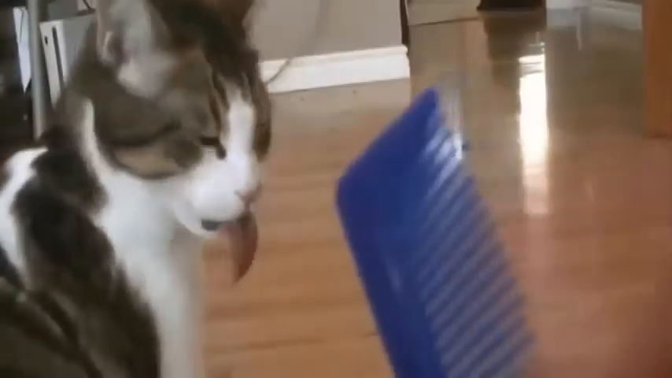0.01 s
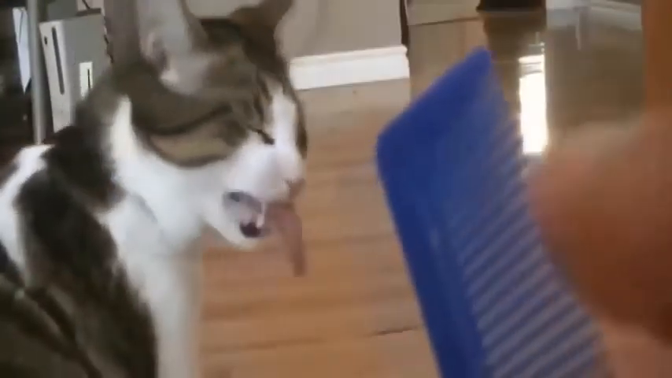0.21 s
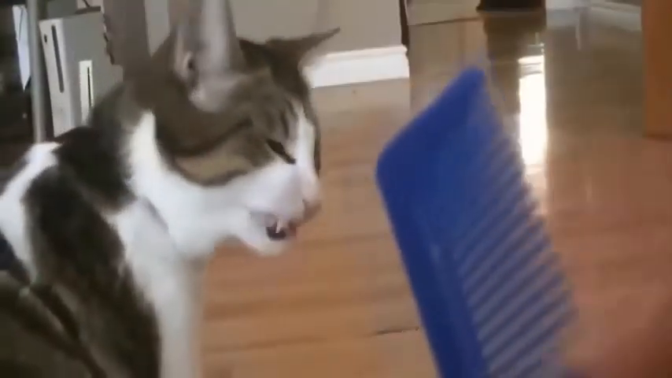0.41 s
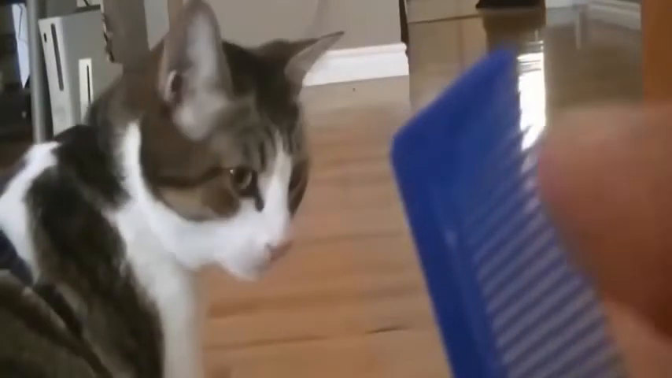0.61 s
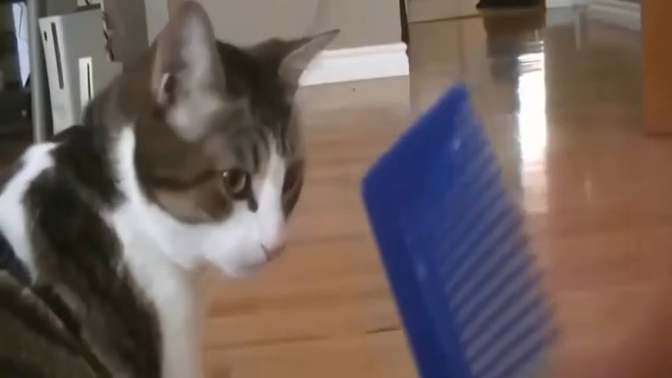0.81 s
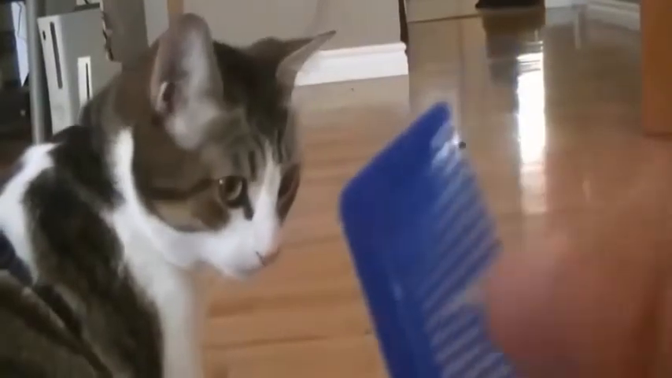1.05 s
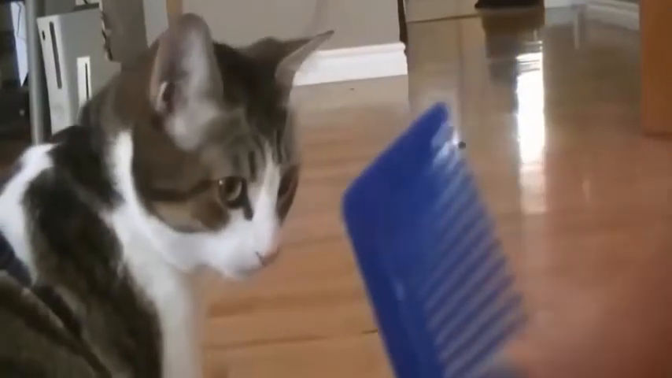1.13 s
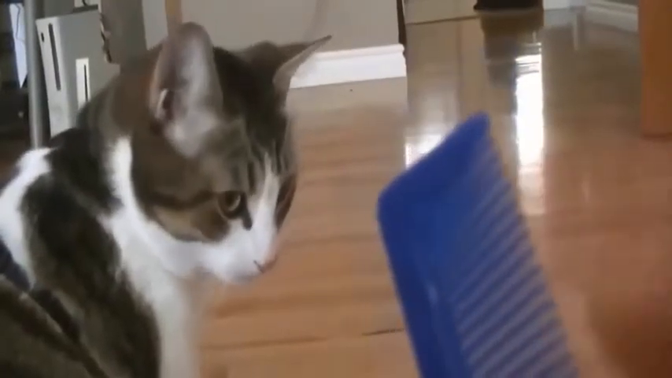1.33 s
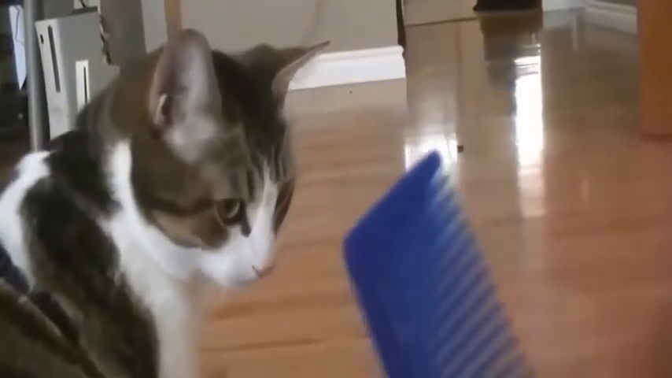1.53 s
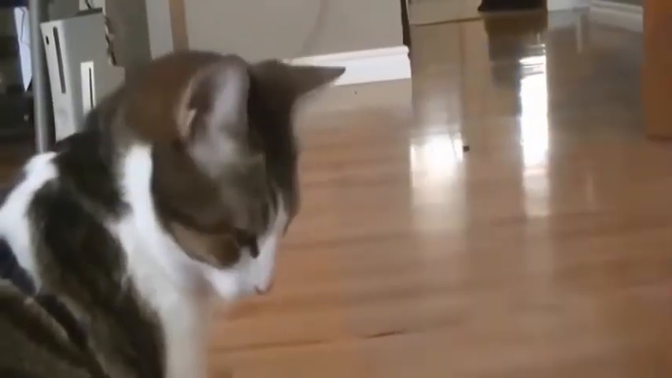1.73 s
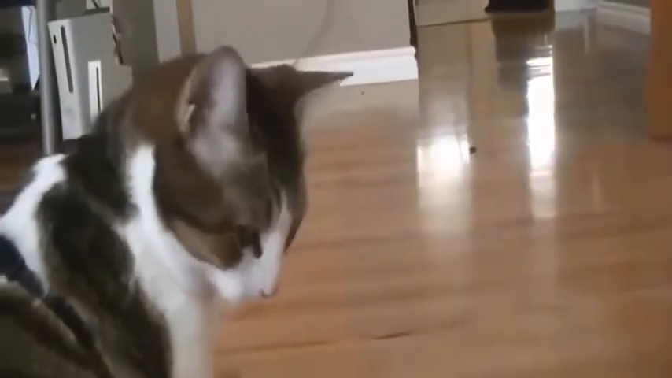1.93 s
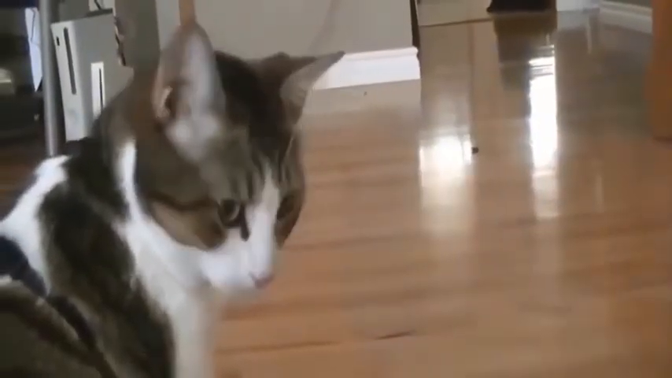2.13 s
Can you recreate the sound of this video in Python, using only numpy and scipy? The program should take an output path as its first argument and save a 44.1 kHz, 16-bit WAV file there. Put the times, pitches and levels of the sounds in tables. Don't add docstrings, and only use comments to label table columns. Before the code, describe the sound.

Plastic comb teeth strummed by a fingernail, close and dry in a bare room. A faint rub and taps open, then five raspy bursts of about ten rapid bright snaps: 0.23-0.37, 0.63-0.76, 1.02-1.21, 1.42-1.61 and 1.81-1.90 seconds, the last quickest. Light ticks fall between. A soft sleeve rustle swells around 2.1 seconds. Quiet hiss and very faint appliance hum lie beneath.

```python
import sys
import numpy as np
from scipy import signal
from scipy.fft import rfft, irfft
from scipy.io import wavfile
from scipy.ndimage import uniform_filter1d

SR = 44100
rng = np.random.default_rng(int(sys.argv[2]) if len(sys.argv) > 2 else 0)


def unload_wav(signal):
    wavfile.write(
        sys.argv[1],
        SR,
        np.round(np.clip(np.atleast_2d(signal).T, -1, 1) * 32767).astype(np.int16),
    )


def volts_from_db(level):
    exponent = np.asarray(level, float) / 20
    return 10 ** exponent


N = 97020

SLIP_S = 0.00058
RING_T60_S = 0.025
TOUCH_SCRAPE_DB = -10


def rms_one(x):
    return x / np.sqrt(np.mean(x ** 2) + 1e-20)


def coloured(points):
    hz, db = np.transpose(points)
    f = np.fft.rfftfreq(N, 1 / SR) + 1
    gain = volts_from_db(np.interp(np.log(f), np.log(hz), db)) * (f < 15900)
    return rms_one(irfft(rfft(rng.standard_normal(N)) * gain, N))


def filtered(x, order, hz, kind):
    return signal.sosfilt(signal.butter(order, hz, kind, fs=SR, output="sos"), x)


def knock(s):
    return 1. * (np.arange(1500) == int(s * SR))


def ring(force, hz, t60):
    r = volts_from_db(-60 / (t60 * SR))
    w = 2 * np.pi * hz / SR
    return signal.lfilter([.5, 0, -.5], [1, -2 * r * np.cos(w), r * r], force + 1e-18)


def add(out, s, x):
    i = int(s * SR)
    out[i:i + len(x)] += x[:N - i]


def rub():
    # t/s, level/dB
    swells = [
        (0, -55),
        (.012, -60),
        (.024, -58),
        (.034, -61),
        (.041, -53.5),
        (.052, -48.5),
        (0.061, -48.5),
        (.066, -60),
        (0.079, -71),
    ]
    # f/Hz, level/dB
    colour = [(900, -31), (1500, 2), (1750, 8), (2100, -6), (3500, -6), (5500, -1), (8500, -9.5),
              (15000, -24)]
    s, db = np.transpose(swells)
    lumps_db = rms_one(uniform_filter1d(rng.standard_normal(N), int(0.00034 * SR)))
    return volts_from_db(np.interp(np.arange(N) / SR, s, db, right=-120) + lumps_db) * coloured(colour)


def air():
    # f/Hz, level/dB
    hiss = [(50, -42), (85, -31), (200, -4.5), (310, -7.5), (620, -4.5), (1000, -10), (2690, -10),
            (15800, -23)]
    # f/Hz, width/Hz, level/dB
    hum = [(238, 4, -73), (590, 40, -82), (706, 15, -78)]
    out = volts_from_db(-57.5) * coloured(hiss)
    for hz, width, db in hum:
        out = out + volts_from_db(db) * rms_one(ring(rng.standard_normal(N), hz, 2.2 / width))
    return out


def crack(place, middle_db=0, top_db=0):
    # f/Hz, level/dB, t60/s, change from mid-stroke to last tooth/dB, reversed towards
    modes = [(460, -22.5, 0.0062, -9.5), (4130, -26, 0.0011, 19), (1620, -10, 0.0028, 0),
             (2890, -6, 0.0039, -3), (3300, -8.5, 0.0071, -4.5), (5030, -23.5, 0.012, -19),
             (5570, -12, 0.0069, -8.5), (6715, -10, 0.0048, -7.5), (8264, -11, 0.0034, -11),
             (8470, -25.5, 0.0027, -13.5), (10690, -8.5, 0.0022, -6), (13400, -24, 0.009, 11),
             (14530, -19, 0.0037, -15.5)]
    spread_s, rebound_db = .0007, -6.5
    cycles_most = 42
    shaded = plain = 0
    for k, (hz, db, t60, change_db) in enumerate(modes):
        level, detune, first, second = rng.uniform(-0.99, 1, 4)
        delay = k * .618 % 1 + .1 * (first + 1)
        force = (-1) ** k * knock(SLIP_S + spread_s * delay * (1 if hz < 6000 else .6))
        if hz > 4000:
            rebound = knock(SLIP_S + 2 * spread_s * abs(second))
            force = force + volts_from_db(rebound_db) * np.sign(second) * rebound
        mode = ring(force, hz * (1 + .02 * detune), min(t60, cycles_most / hz))
        mode = volts_from_db(db + 2 * change_db * place + 2 * level) * mode
        shade_db = top_db if hz > 7500 else middle_db if hz > 4200 else 0
        plain = plain + mode
        shaded = shaded + volts_from_db(shade_db) * mode
    pull = knock(SLIP_S + spread_s / 2)
    return shaded / np.abs(plain).max(), pull


def soften(x):
    return filtered(x, 2, [2300, 6800], "band")


def touches():
    # t/s, peak/dB
    taps = [
        (0.021, -46),
        (0.04, -37),
        (.0575, -31),
        (0.0608, -44),
        (0.41, -37),
        (.399, -57),
        (1.6114, -35),
        (1.63, -38),
        (1.8018, -39),
        (0.67, -42),
    ]
    out, push = np.zeros((2, N))
    for s, db in taps:
        tick, pull = crack(0)
        add(out, s, volts_from_db(db) * (soften(tick) + volts_from_db(-23) * ring(pull, 1740, RING_T60_S)))
        push[int(s * SR)] = volts_from_db(db + TOUCH_SCRAPE_DB)
    return out, push


def held(x, hold_s):
    t = np.maximum(np.arange(len(x)) / SR - SLIP_S, 0)
    return x * (1 - np.exp(-t / .0009)) * np.exp(-(t / hold_s) ** 3)


def spine_ring(pull):
    hz = 1055
    return held(ring(pull, hz, RING_T60_S), 0.0074) + volts_from_db(3.5) * ring(pull, hz, 0.0032)


def tooth_ring(pull, hz, beside_db, progress):
    pair = ring(pull, hz, RING_T60_S) - volts_from_db(beside_db) * ring(pull, 2250, RING_T60_S)
    tooth = held(pair, .0042 + .0011 * progress)
    tooth = tooth + volts_from_db(1.5) * ring(pull, hz * 1.07, 0.0026)
    return filtered(tooth, 2, 1060, "high")


def trail(drag, s, db):
    t = np.arange(N) / SR - s
    return np.where(t < 0, drag, volts_from_db(db) * np.exp(-np.abs(t) / 0.011))


def teeth():
    # t/s, crack peak/dB, spine ring re crack/dB, tooth ring re crack/dB, tooth pitch f/Hz
    stroke_1 = [(0.2289, -12.5, -9.5, -17, 1950), (0.2474, -10.5, -14, -35, 2170),
                (0.264, -9.5, -16, -5.5, 2200), (0.281, -10, -15.5, -8.5, 1980),
                (0.2971, -9, -45, -10, 2130), (0.3097, -12, -16.5, -11, 1990), (0.3234, -13, -52, -5, 2050),
                (0.3412, -11.5, -35, -10, 2030), (0.3461, -18.5, -11.5, 1.5, 1930),
                (0.374, -16, -18, -2.5, 1920), (0.4232, -39.5, -81, -47, 1720),
                (0.4436, -44, -35, -82, 1900)]
    stroke_2 = [
        (0.632, -10.5, -12, -10, 2240),
        (0.653, -9.5, -18.5, -16, 2160),
        (0.6715, -8.5, -17.5, -21, 2200),
        (0.6884, -9.5, -18.5, -12, 2050),
        (0.7081, -9, -18, -12, 1920),
        (0.7238, -11, -25, -11, 2100),
        (0.7426, -12.5, -20, -7.5, 1970),
        (0.7645, -11.5, -58, -6, 1915),
        (0.8136, -40, -11, -24, 1890),
        (0.8203, -40.5, -19, -5, 1720),
    ]
    stroke_3 = [(1.0195, -20.5, -7.5, -9, 1740), (1.043, -12.5, -13.5, -12.5, 2100),
                (1.069, -9, -15.5, -17, 2140), (1.0901, -9, -16.5, -14, 2150), (1.108, -5, -43, -12, 2160),
                (1.124, -11, -14.5, -7.5, 1970), (1.1369, -11.5, -29, -16, 2060),
                (1.15, -19.5, -14, 1.5, 1920), (1.16, -12.5, -56, -3.5, 2010),
                (1.1811, -13.5, -21, -5, 1890), (1.2094, -23.5, -16, -2.5, 1840)]
    stroke_4 = [(1.4172, -15, -14.5, -6.5, 2140), (1.4354, -14.5, -11.5, -5.5, 2080),
                (1.4532, -10, -18, -6, 2130), (1.4692, -10, -15.5, -6, 2050), (1.485, -9, -34, -16, 2130),
                (1.5, -11, -20, -7, 2090), (1.5135, -12, -39, -7, 1980), (1.5227, -15.5, -14, -3, 2030),
                (1.5395, -13, -27, -4, 1890), (1.556, -14, -19, -2.5, 1890), (1.5826, -11, -25, -9, 1805),
                (1.6067, -31, -19, 0.5, 1750), (1.6233, -35.5, -37, -9, 1650)]
    stroke_5 = [
        (1.8051, -18, -11, -8, 2160),
        (1.8137, -14.5, -13.5, -12, 2010),
        (1.8294, -18, -7, -3, 2100),
        (1.845, -7.5, -25, -20, 2120),
        (1.8595, -10.5, -17.5, -15, 1900),
        (1.8738, -15, -15, 0.5, 2080),
        (1.888, -10, -49, -6.5, 1950),
        (1.8966, -17, -34, -5, 2080),
        (1.9041, -19, -29, -8, 2100),
        (1.9172, -38, -26, -18, 1940),
    ]
    neighbour_db = [
        [-14, -14, -19, -14, -12, -12, -16, -12, -10, -9, -14, -14],
        [-16, -14, -14, -14, -12, -12, -6, -6, -14, -14],
        [-8, -17, -14, -14, -16, -10, -12, -6, -10, -3, -4],
        [-14, -17, -18, -16, -14, -16, -12, -7, -9, -6, 2, -1, -8],
        [-14, -14, -14, -12, -13, -14, -12, -10, -12, -10],
    ]
    # middle modes/dB, top modes/dB, drag after the snap re crack/dB
    shade = [(-1.7, -0.2, -9), (2, -1, 9.5), (3.8, -1, 7.5), (1, 5, 9), (2.3, 2.5, 2.5), (1.5, 5.5, 7),
             (3, 4, 1.5), (1, -1, 0.0), (8, 1.1, 9.5), (6.5, -7, -6), (9.5, 6, 7), (2, 13, 2), (-2, 0, -2.5),
             (-1, -0.9, 3), (-0.9, -1.0, -3), (-2, 2.5, 4.7), (-3, 3, 0), (-3, 1, 4.5), (-2.1, 0.5, -1),
             (-5, -0.5, 1.2), (-3, -0.3, 4), (9.5, 2.1, 6), (-2, -3, 5), (-1, -9, -3.5), (0, 0, 0.4),
             (1.5, 1.5, 6), (-7, -1.1, -1), (-1, 7, 2), (1, 2, 5.5), (4, 1.8, 13), (4, -1, -1.5),
             (2.5, -2.5, -9), (3.5, -15, -0.3), (-6, -8, 5), (-1, -0.5, 7), (-2.5, 3.5, 3), (-0.7, 1, -1.8),
             (-4, 5, 7), (-5, 5, 4), (-8, 4, 6), (-1, 3.5, 7), (-1, 2.9, 5), (1.9, 0, 5), (-1.5, 1, -6),
             (3, -7, 14), (-1.9, 4, 12), (0, -2.8, 6), (-1.5, -13, 5), (7.5, 2.5, -2.4), (0.3, -2.8, -2),
             (-7, 3.5, 11), (1, 5.5, -2), (-4, 2.5, -5), (6, -2, 7.5), (8, -3, 10.7), (9, 6.7, 3)]
    out, push, drag = np.zeros((3, N))
    shades = iter(shade)
    for stroke, beside_db in zip((stroke_1, stroke_2, stroke_3, stroke_4, stroke_5), neighbour_db):
        for k, (s, db, spine_db, tooth_db, hz) in enumerate(stroke):
            progress = k / len(stroke)
            middle_db, top_db, drag_db = next(shades)
            light = db < -31.5
            snap, pull = crack(progress - .5, middle_db, top_db)
            x = 2 * soften(snap) if light else snap
            x = x + volts_from_db(tooth_db - 0.55) * tooth_ring(pull, hz, beside_db[k], progress)
            x = x + volts_from_db(spine_db + 0.5) * spine_ring(pull)
            if not light:
                x = x + volts_from_db(-38.5) * ring(pull, 233, 0.016)
            add(out, s, volts_from_db(db) * x)
            push[int(s * SR)] = volts_from_db(db + light * TOUCH_SCRAPE_DB)
            drag = trail(drag, s, db + drag_db)
    return out, push, drag


def scrape(push, drag):
    # f/Hz, level/dB
    colour = [(300, -14), (1000, -6), (2000, 0), (4000, -7), (6000, -7.5), (10000, -11.5), (16000, -16)]
    swell = np.exp(np.arange(-2000, 2001) / SR / 0.0036) * (np.arange(4001) < 2000)
    lead = signal.fftconvolve(push, swell, "same")
    return volts_from_db(-27.5) * (lead + drag) * coloured(colour)


def sleeve():
    # t/s, level/dB
    rustle = [
        (1.95, -64),
        (1.976, -69),
        (1.997, -65),
        (2.102, -47),
        (2.186, -53),
        (2.2, -51),
    ]
    # f/Hz, level/dB
    cloth = [(200, -45), (530, -8), (900, -7), (1130, -15), (1440, -5.5), (2080, -5.5), (7670, -4),
             (15000, -18)]
    s, db = np.transpose(rustle)
    return volts_from_db(np.interp(np.arange(N) / SR, s, db, left=-120)) * coloured(cloth)


def room(x):
    t = np.arange(SR // 2) / SR
    early, late = rng.standard_normal((2, len(t))) * np.clip(t / 0.00033, 0, 1)
    early = early * volts_from_db(-60 * t / 0.063)
    late = late * volts_from_db(-60 * t / 0.37)
    echo = volts_from_db(-30.5) * early / np.linalg.norm(early) + volts_from_db(-24) * late / np.linalg.norm(late)
    return signal.fftconvolve(x, filtered(echo, 1, 19000, "low"))[:N]


def scene():
    ticks, touch_push = touches()
    snaps, push, drag = teeth()
    comb = rub() + ticks + snaps + scrape(push + touch_push, drag)
    comb = filtered(comb + room(comb), 2, 124, "high")
    return np.tile(comb + sleeve() + air(), (2, 1))


def roll_off(x):
    return signal.sosfilt(signal.butter(12, 17140, fs=SR, output="sos"), x)


def record(dry):
    cut = signal.sosfilt(signal.cheby2(12, 70, 17300, fs=SR, output="sos"), dry)
    return roll_off(cut)


dry = scene()
out = record(dry)
unload_wav(out)
```